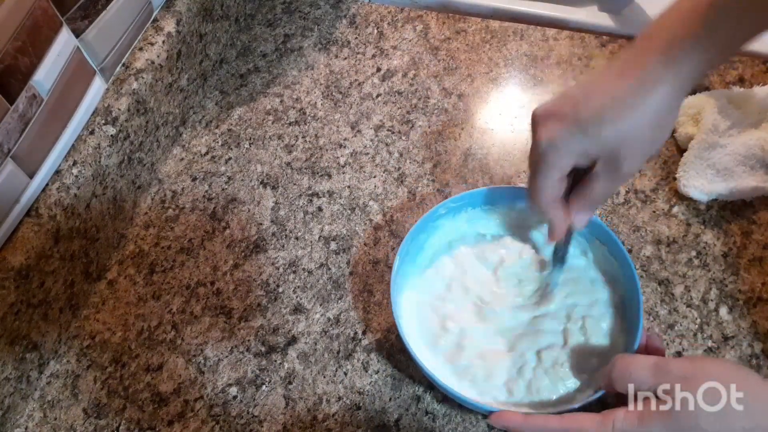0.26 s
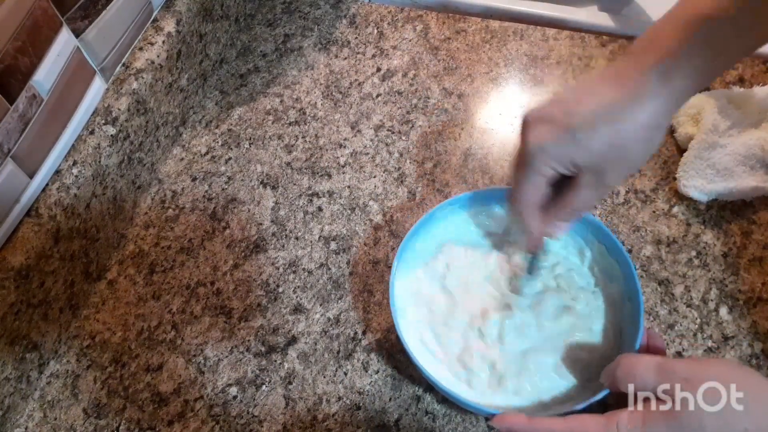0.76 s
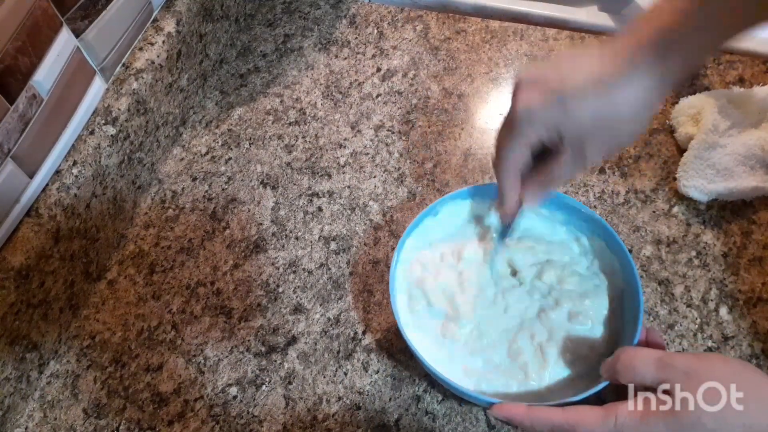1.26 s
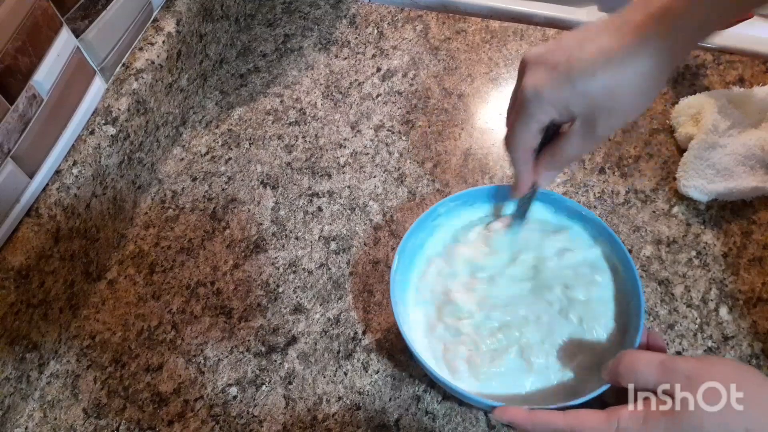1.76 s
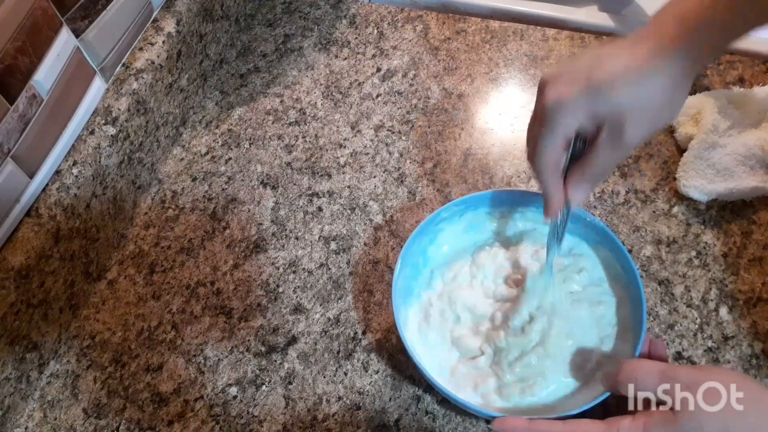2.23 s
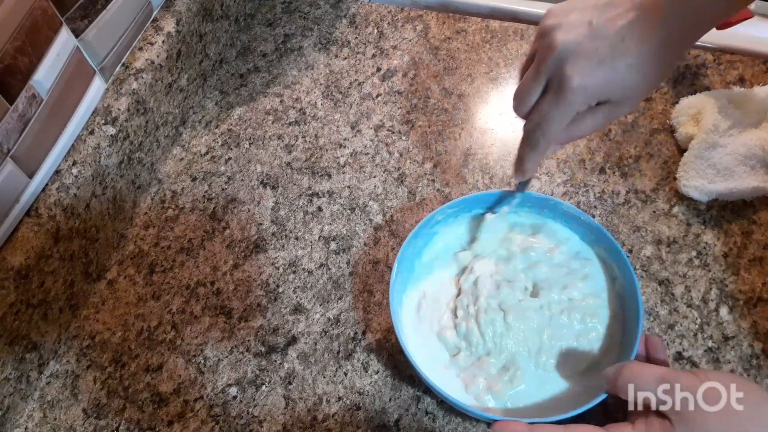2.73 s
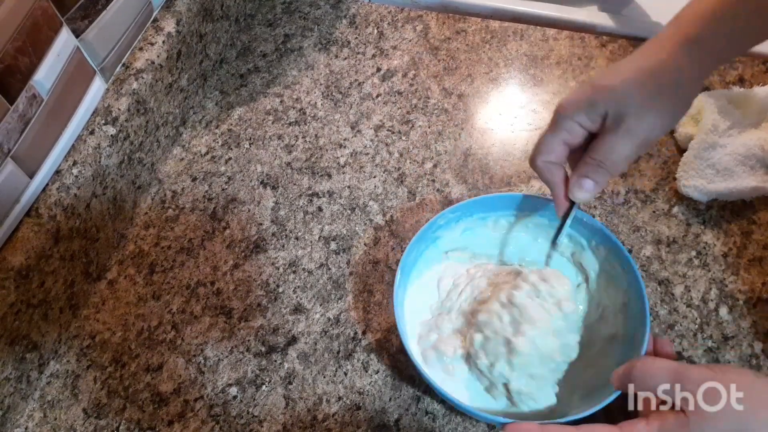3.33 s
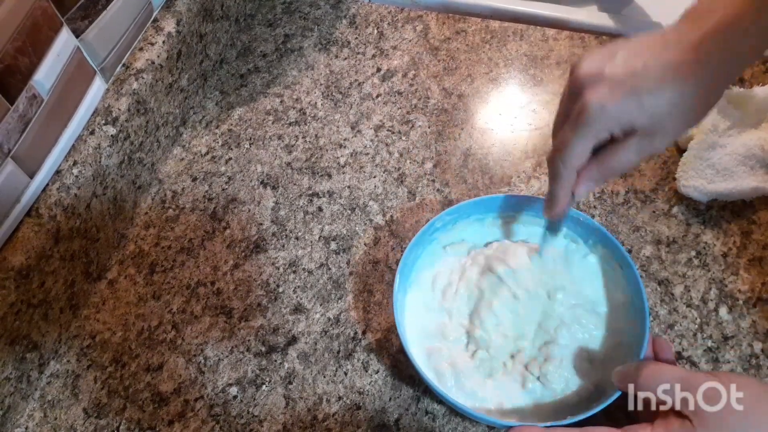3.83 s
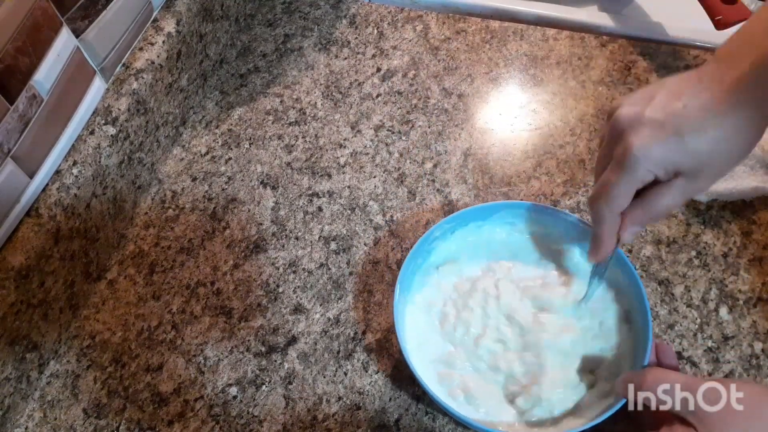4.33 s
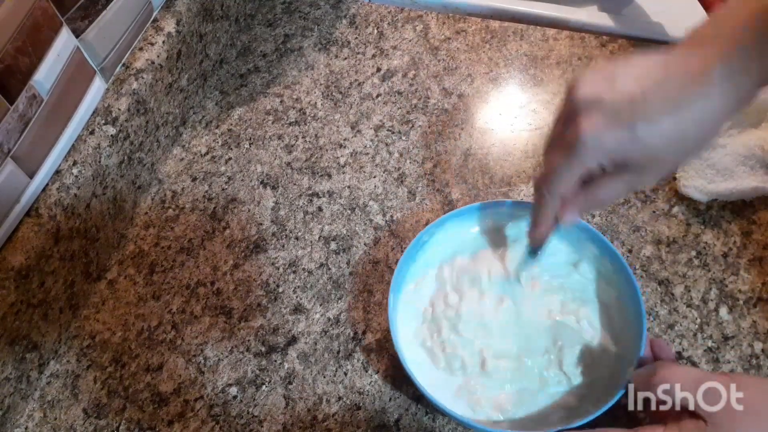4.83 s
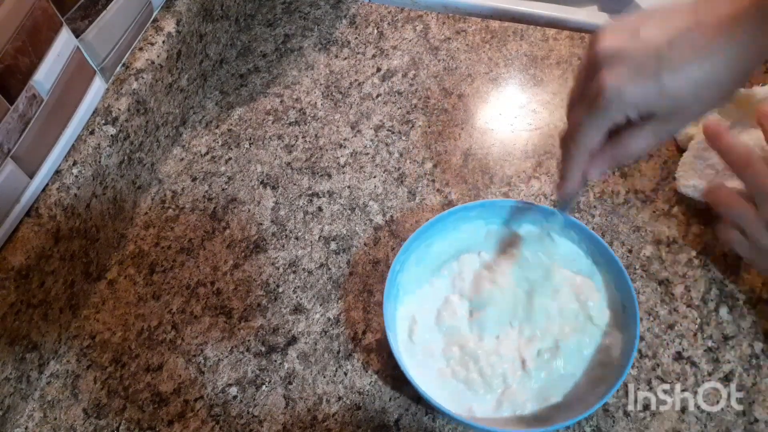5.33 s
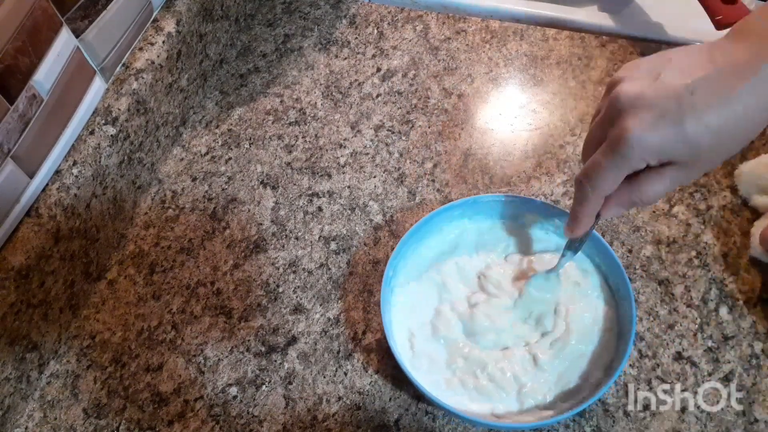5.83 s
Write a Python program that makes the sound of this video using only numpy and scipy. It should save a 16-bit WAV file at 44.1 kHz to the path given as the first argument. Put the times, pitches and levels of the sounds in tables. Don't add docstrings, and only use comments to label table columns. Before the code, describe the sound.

Quick rhythmic spoon scraping through thick batter in a plastic bowl, then a pause, heavier knocks and slow folds over faint fridge hum.

```python
import sys
import numpy as np
from scipy import signal
from scipy.fft import rfft, irfft
from scipy.io import wavfile
from scipy.ndimage import uniform_filter1d

SR = 44100
rng = np.random.default_rng(int(sys.argv[2]) if len(sys.argv) > 2 else 0)


def ratio_of_db(decibels):
    return 10 ** (np.asarray(decibels, float) / 20)


def master(y):
    cut = np.clip(np.atleast_2d(y).T, -1, 1)
    pcm = np.round(cut * 32767)
    wavfile.write(sys.argv[1], SR, pcm.astype(np.int16))


N = 268128

# (start [s], rise [ms], hold [ms], fall per 20 dB [ms], hiss level [dB])
SWEEPS = [
    (-0.05, 20, 33, 35, -44),
    (0.16, 67, 45, 104, -41),
    (0.462, 28.7, 66.5, 41, -41),
    (0.724, 12.3, 95.4, 47, -41),
    (1.022, 16, 77.5, 13, -44.5),
    (1.275, 15, 38.4, 82, -39),
    (1.562, 4.6, 53, 65, -45.5),
    (1.82, 30, 52, 75, -49.5),
    (2.101, 2.1, 25, 46, -45),
    (4.585, 72, 13, 37, -49.5),
]
# (start [s], rise [ms], hold [ms], fall per 20 dB [ms], hiss level [dB])
RETURNS = [
    (0.046, 20, 137, 63, -55),
    (0.371, 1.4, 6.1, 285, -48.5),
    (0.604, 28, 88, 51, -53),
    (0.85, 107, 105, 43, -51.5),
    (1.11, 28, 120, 72, -51.5),
    (1.429, 37, 23, 171, -51),
    (1.692, 77, 53, 72, -51.5),
    (2.002, 21, 122, 73, -57),
]
# (start [s], rise [ms], hold [ms], fall per 20 dB [ms], hiss level [dB])
FOLDS = [
    (2.691, 160, 30, 197, -51.5),
    (2.979, 43, 4.8, 89, -60),
    (3.728, 0.94, 4.2, 112, -60.5),
    (4.073, 5.3, 24, 64, -64),
    (4.152, 4.8, 4.1, 49, -62),
    (4.839, 12, 160, 106, -64),
]
# (start [s], rise [ms], hold [ms], fall per 20 dB [ms], hiss level [dB])
BRUSHES = [
    (2.23, 8.5, 140, 58, -78.5),
    (3.15, 19, 28, 83, -91),
    (4.3, 34, 22, 55, -76),
    (4.72, 13, 140, 60, -75),
    (5.03, 72, 28, 149, -67.5),
    (5.2, 122, 105, 197, -68),
    (5.452, 240, 400, 107, -85.5),
    (5.9, 150, 35, 108, -82),
]
# (frequency [Hz], width [Hz], level [dB])
SPOON_MODES = [(6230, 130, 15), (8270, 390, 22), (5200, 330, 16), (10530, 580, 22.5), (12840, 430, 21.5)]
# (frequency [Hz], density [dB per Hz])
HISS_SPECTRUM = [(1290, 1), (2200, 1.5), (2490, 3.5), (3530, 2.5), (6160, 2.5), (6640, 0), (8240, 1),
                 (9800, -3.5), (12600, -2), (15100, -2), (16000, -57.5)]


def slide():
    contacts = [sum(stroke(*row) for row in rows) for rows in (SWEEPS, RETURNS, FOLDS, BRUSHES)]
    dull_db = (-10.5, -5.5, -1, -17)
    dull_gain = sum(ratio_of_db(db) * gain for db, gain in zip(dull_db, contacts))
    slips = grains(20000.0, spread_db=1, shared=0.19)
    rings = 0
    for hz, width_hz, db in SPOON_MODES:
        rings = rings + ratio_of_db(db + 7.1 * drift(25.0)) * rms_one(resonate(slips, hz, 2.06 * width_hz))
    hiss = rms_one(colour(slips + ratio_of_db(-6.5) * rms_one(rings), HISS_SPECTRUM))
    dull = signal.sosfilt(signal.butter(2, 6800, fs=SR, output="sos"), hiss)
    bright = hiss - dull
    unsteady = ratio_of_db(1.3 * drift(36.0) - 1.5)
    return unsteady * (ratio_of_db(4.5 + 2.0 * drift(7.4)) * dull_gain * dull + sum(contacts) * bright)


# (start [s], rise [ms], hold [ms], wall level [dB], brightest pitch [Hz])
WHISK_DRAGS = [(-0.08, 164, 130, -49.5, 1490), (0.15, 16, 60, -52, 2500), (0.291, 90, 85, -44.5, 1450),
               (0.46, 59, 52, -54.5, 1980), (0.58, 66, 74, -45.5, 1670), (0.72, 11, 100, -51.5, 1980),
               (0.85, 97, 56, -44.5, 1600), (1.01, 32, 37, -56, 1940), (1.1, 112, 57, -46.5, 1790),
               (1.259, 66, 9.6, -38, 2020), (1.43, 55, 47, -47.5, 1280), (1.55, 48, 15, -42.5, 2170),
               (1.702, 39, 78, -45.5, 1370), (1.82, 35, 31, -50, 1830), (1.984, 85, 15, -47, 1410),
               (2.079, 54, 23, -51.5, 1740)]
# (start [s], rise [ms], fall per 20 dB [ms], wall level [dB], brightest pitch [Hz])
FOLD_DRAGS = [(2.687, 2.4, 49, -45, 1080), (2.7, 47, 110, -40.5, 1270), (2.82, 90, 113, -40, 1990),
              (2.815, 29, 135, -49, 1540), (2.94, 43, 80, -45.5, 1440), (3.019, 36, 44, -51.5, 1490),
              (3.2, 160, 264, -79, 1230), (3.726, 1.9, 104, -51, 1380), (3.78, 51, 31, -56.5, 1370),
              (4.075, 7.8, 94, -56, 1180), (4.152, 4, 47, -57, 1610), (4.17, 13, 122, -64, 1910),
              (4.28, 150, 400, -78, 1780), (4.582, 3.7, 156, -57.5, 1530), (4.6, 37, 35, -64, 1600),
              (4.84, 12, 70, -56, 1570), (4.883, 2.8, 53, -43.5, 1480), (4.93, 63, 62, -55.5, 1900),
              (5.05, 45, 212, -63.5, 1140), (5.3, 100, 159, -67.5, 1260), (5.72, 220, 396, -77, 1760),
              (5.92, 92, 301, -63.5, 1100)]
# (start [s], rise [ms], hold [ms], fall per 20 dB [ms], level [dB])
PRESSES = [
    (2.692, 2.7, 5, 36, -39),
    (2.722, 2.8, 12, 76, -52),
    (2.78, 9.7, 126, 90, -55.5),
    (2.96, 23, 15, 98, -60),
    (3.28, 49, 21, 200, -70),
    (4.075, 2.2, 12, 80, -53.5),
    (4.583, 6.9, 31, 56, -65),
    (4.87, 19, 8, 72, -80),
]


def drag_controls():
    whisk = [stroke(s, rise, hold, 62.6, db) for s, rise, hold, db, hz in WHISK_DRAGS]
    fold = [stroke(s, rise, 1.8, fall, db) for s, rise, fall, db, hz in FOLD_DRAGS]
    wall = sum(whisk) + sum(fold)
    centre_hz = sum(gain * row[-1] for gain, row in zip(whisk + fold, WHISK_DRAGS + FOLD_DRAGS)) / wall
    focus_db = (5 * sum(whisk) + 13 * sum(fold)) / wall
    bottom = ratio_of_db(-12.5) * sum(whisk) + ratio_of_db(-10) * sum(fold)
    bottom = bottom + ratio_of_db(-32.5) * shudder(0.0074, 0.24)
    bottom = bottom + ratio_of_db(-19.5 + in_time(WEIGHT)[0])
    bottom = bottom + sum(stroke(*row) for row in PRESSES)
    return wall, centre_hz, bottom, focus_db


SHARED_DRAG = 0.37
# (frequency [Hz], width [Hz], level [dB])
WALL_MODES = [(384, 69, 6.5), (468, 95, 3.5), (593, 60, -4), (692, 53, -3.5), (744, 63, -4), (970, 207, 7),
              (1176, 56, -1), (1280, 210, 2), (1575, 95, -1), (1789, 137, -1.5), (2170, 630, -2),
              (2680, 185, 1.5), (3360, 520, 9)]


def drag():
    wall, centre_hz, bottom, focus_db = drag_controls()
    slips = grains(4000.0, spread_db=3, shared=SHARED_DRAG)
    upper, lower = 0, 0
    for k, (hz, width_hz, db) in enumerate(WALL_MODES):
        ring = rms_one(resonate(resonate(slips, hz, width_hz), hz, 2.27 * width_hz))
        ring = (-1) ** k * ratio_of_db(db + 3.52 * drift(30.0)) * ring
        if hz > 880:
            nearness = ratio_of_db(-np.clip(focus_db, 0, 40) * np.log2(hz / centre_hz) ** 2)
            upper = upper + (nearness + 0.012) * ring
        else:
            lower = lower + 0.34 * ring + 0.5 * ring[0]
    lower = signal.sosfilt(signal.butter(6, 310, "high", fs=SR, output="sos"), lower)
    return ratio_of_db(1.05 * drift(72.0) - 6.5) * (wall * evened(upper) + bottom * evened(lower))


# (start [s], rise [ms], fall per 20 dB [ms], level [dB], centre [Hz])
BITES = [(0.068, 4.2, 60, -69, 6700), (0.19, 17, 57, -52, 5000), (0.245, 26, 63, -46, 7210),
         (0.374, 2, 30, -66, 5500), (0.52, 18, 53, -47, 7480), (0.628, 3.9, 36, -54.5, 8400),
         (0.646, 3, 38, -58, 5400), (0.775, 24, 64, -48, 7400), (0.951, 4, 56, -58, 4450),
         (1.06, 23, 62, -61, 5050), (1.214, 7.5, 54, -50.5, 5200), (1.29, 7.8, 46, -53, 7900),
         (1.435, 2.2, 48, -57, 5770), (1.453, 2.2, 94, -71, 7930), (1.57, 4.6, 26, -41, 9200),
         (1.585, 6, 65, -42, 5960), (1.707, 2.8, 58, -58.5, 6580), (1.84, 4.2, 49, -50, 8300),
         (1.895, 7.2, 31, -60, 11300), (2.11, 14, 21, -50, 3400), (2.99, 13, 66, -55, 12800),
         (3.73, 0.89, 103, -53, 5720), (4.612, 50, 52, -60, 6000), (4.66, 20, 36, -62.5, 5030),
         (4.586, 7.1, 83, -64, 1706)]
# (start [s], rise [ms], fall per 20 dB [ms], level [dB], pitch [Hz])
FLARES = [(0.06, 9.4, 50, -56, 1805), (0.185, 24, 53, -49.5, 2533), (0.37, 20, 52, -51, 1775),
          (0.39, 66, 47, -53, 1163), (0.42, 16, 30, -53, 2400), (2.724, 8.2, 50, -45, 654),
          (0.69, 16, 26, -52, 1700), (0.735, 11, 43, -54, 2520), (0.74, 15, 54, -49, 3350),
          (2.97, 38, 60, -50, 1627), (4.157, 2.8, 25, -49.5, 1857), (1.0, 5.1, 15, -45, 1620),
          (1.2, 10, 48, -57.5, 1220), (1.47, 39, 53, -51.5, 1158), (1.76, 4.7, 44, -47, 1240),
          (2.689, 4.5, 16, -30, 407), (2.73, 4.6, 50, -51, 1350), (2.724, 3.5, 57, -44.5, 496),
          (2.79, 20, 38, -41.5, 414), (2.842, 4, 20, -42, 1330), (2.878, 4, 5, -35, 1760),
          (2.88, 5.1, 24, -45, 2950), (2.895, 9.1, 38.5, -52, 2210), (3.061, 3.3, 8, -44, 1518),
          (4.077, 2, 18, -50, 337), (4.586, 29, 38, -55.5, 1346), (4.601, 6.7, 41, -64, 2000),
          (4.886, 1.7, 18, -53, 1430)]
# (time [s], level [dB], pitch [Hz])
GLIDES = [
    [(2.81, -56, 1415), (2.85, -48.5, 1550), (2.88, -47, 1725), (2.906, -46.5, 1785), (2.94, -50, 1700),
     (3.0, -56, 1608), (3.05, -58, 1486), (3.09, -54.5, 1620), (3.13, -81, 1700)],
    [(4.58, -72, 1376), (4.61, -69, 1420), (4.67, -61, 1490), (4.71, -74, 1514)],
    [(5.72, -101, 1476), (5.85, -78, 1750), (5.95, -73, 1960), (6.08, -84, 1800)],
]
GLIDE_WIDTHS_HZ = [340, 260, 360]


def flares():
    out = np.zeros((2, N + SR))
    ms = np.arange(SR // 4) / SR * 1000
    for rows, relative_width in ((BITES, 0.23), (FLARES, 0.045)):
        for s, rise, fall, db, hz in rows:
            climb = np.clip(1 - ms / max(rise, 1), 0, 1)
            fade = np.clip(ms - rise, 0, None) / max(fall, 1)
            start = round(s * SR)
            out[:, start:start + len(ms)] += sing(hz, ratio_of_db(db - 20 * (climb + fade)), relative_width * hz)
    for rows, width_hz in zip(GLIDES, GLIDE_WIDTHS_HZ):
        s, db, hz = np.transpose(rows)
        i = np.arange(round(s[0] * SR), round(min(s[-1], s[0] + 0.38) * SR))
        out[:, i] += sing(np.interp(i / SR, s, hz), ratio_of_db(np.interp(i / SR, s, db)), width_hz)
    return out[:, :N]


# (time [s], level [dB], pitch [Hz])
STREAKS = [
    [(0.0, -64, 1800), (0.1, -64, 1790), (0.33, -66.5, 1850), (0.5, -56, 1950), (0.62, -67.5, 1800),
     (0.9, -57.5, 1850), (1.08, -59, 1800), (1.3, -72.5, 1800), (2.2, -72.5, 1800)],
    [(0.0, -69, 2350), (0.2, -62, 2500), (0.33, -74, 2350), (0.58, -64, 2380), (0.7, -73, 2300),
     (0.84, -72, 2360), (1.05, -67, 2300), (1.3, -78, 2450), (2.2, -86, 2450)],
]


def streaks():
    out = 0
    r = np.exp(-2 * np.pi * 90.0 / SR)
    for rows in STREAKS:
        db, hz = in_time(rows)
        db = db - 3.0 + 5.0 * drift(14.0)
        hz = hz + 70.0 * drift(5.0)
        noise = rng.standard_normal((2, N)) + 1j * rng.standard_normal((2, N))
        slow = signal.lfilter([1], [1, -2 * r, r * r], noise + noise[0])
        ring = rms_one(np.real(slow * np.exp(2j * np.pi * np.cumsum(hz) / SR)))
        sounding = np.arange(N) < rows[-1][0] * SR
        out = out + sounding * ratio_of_db(db) * ring
    return out


# (time [s], peak level [dB], pitch [Hz], decay T60 [s])
THUMPS = [(0.043, -44, 190, 0.069), (0.07, -60, 196, 0.083), (0.204, -35.5, 133, 0.015),
          (0.235, -40.5, 183, 0.048), (0.48, -36, 140, 0.031), (0.741, -35, 144, 0.03),
          (1.036, -35, 140, 0.047), (1.29, -38.5, 166, 0.045), (1.325, -35, 182, 0.028),
          (1.339, -28, 166, 0.024), (1.357, -49.5, 140, 0.034), (1.399, -33, 145, 0.037),
          (1.588, -38, 156, 0.034), (1.657, -31.5, 140, 0.04), (1.735, -47.5, 112, 0.068),
          (1.852, -40.5, 119, 0.058), (2.139, -47, 161, 0.051), (2.689, -21.5, 205, 0.033),
          (2.704, -41, 177, 0.04), (2.751, -44.5, 220, 0.07), (2.794, -39.5, 197, 0.033),
          (2.899, -45, 198, 0.062), (2.993, -31, 155, 0.035), (3.015, -38, 167, 0.046),
          (3.27, -41.5, 140, 0.11), (3.337, -33.5, 176, 0.036), (3.735, -23.5, 153, 0.03),
          (4.046, -48.5, 163, 0.046), (4.081, -28, 164.5, 0.031), (4.156, -47.5, 170, 0.025),
          (4.591, -39, 137, 0.015), (4.846, -40.5, 153, 0.057), (4.868, -30, 167, 0.027),
          (4.888, -24.5, 169.4, 0.047), (4.902, -32.5, 209, 0.027), (4.92, -53, 180, 0.024),
          (4.977, -39.5, 134, 0.05), (5.44, -40.5, 91, 0.077), (5.472, -56, 89, 0.086),
          (5.768, -60, 91.5, 0.042)]


def shudder(rise_s, t60_s):
    out, t = np.zeros(N), np.arange(SR // 2) / SR
    for s, peak_db, hz, t60 in THUMPS:
        add(out, s, (1 - np.exp(-t / rise_s)) * ratio_of_db(-60 * t / t60_s), 0.79 * peak_db - 8.5)
    return out


# (time [s], rumble level [dB])
WEIGHT = [(0.0, -46.5), (1.1, -48.5), (1.2, -53), (1.35, -58), (1.55, -53.5), (1.9, -51), (2.05, -57.5),
          (2.55, -74), (2.8, -59), (3.1, -53.5), (3.55, -77), (4.0, -64), (4.25, -53.5), (4.65, -56),
          (4.8, -66), (5.15, -56), (5.6, -72), (6.08, -78)]
# (frequency [Hz], width [Hz], level [dB])
COUNTER_MODES = [(124.6, 20, 7.5), (140, 41, 10), (180, 22, 6), (223.3, 9.8, 4)]


def rock():
    slips = grains(600.0, spread_db=2, shared=1)[0]
    body = 0
    for hz, width_hz, db in COUNTER_MODES:
        body = body + ratio_of_db(db) * resonate(resonate(slips, hz, width_hz), hz, 2 * width_hz)
    thumps, t = np.zeros(N), np.arange(SR // 4) / SR
    for s, peak_db, hz, t60 in THUMPS:
        swell = t ** 2.75 * ratio_of_db(-100 * t / np.clip(t60, 0.02, 0.3))
        phase = 2 * np.pi * hz * t
        partials = np.sin(phase) + 0.14 * np.sin(0.758 * phase) + 0.042 * np.sin(1.51 * phase)
        add(thumps, s - 0.004, swell * partials, peak_db - 1.5)
    rumble = ratio_of_db(in_time(WEIGHT)[0] - 10.0) + ratio_of_db(-17.0) * shudder(0.0053, 0.32)
    low = thumps + rumble * rms_one(body)
    low = signal.sosfilt(signal.butter(2, 55, "high", fs=SR, output="sos"), low)
    return signal.sosfilt(signal.butter(5, 285, fs=SR, output="sos"), low)


# (time [s], peak level [dB], pitch [Hz])
KNOCKS = [(1.54, -33, 1150), (1.815, -31.5, 1320), (2.69, -28, 667), (2.724, -25, 500), (2.735, -37, 644),
          (2.731, -32, 970), (2.901, -28, 1740), (3.728, -40.5, 1499), (3.82, -47, 1790), (4.076, -33, 420),
          (4.157, -33, 1500), (4.586, -50, 1300), (4.849, -52, 1370), (4.886, -38, 417), (4.978, -47, 600)]


def knocks():
    out, t = np.zeros(N), np.arange(SR // 10) / SR
    for s, peak_db, centre_hz in KNOCKS:
        contact = rng.standard_normal(len(t)) * ratio_of_db(-60 * t / 0.011)
        ring = 0
        for hz, width_hz, db in WALL_MODES:
            gain = ratio_of_db(db - 83.0 * np.log2(hz / centre_hz) ** 2) + 0.0068
            ring = ring + gain * resonate(resonate(contact, hz, 0.89 * width_hz), hz, 2.0 * width_hz)
        add(out, s, ring, peak_db - 10.0)
    return out


# (time [s], peak level [dB], pitch [Hz], spread [octaves])
TICKS = [(0.374, -40.5, 7000, 2.2), (2.0096, -45, 5170, 0.25), (2.1027, -38, 5100, 1.3),
         (2.2473, -47.5, 4850, 0.42), (2.313, -58, 8100, 0.65), (2.368, -58, 13000, 1.2),
         (2.415, -64, 5700, 0.92), (2.689, -51, 5840, 0.16), (3.003, -35, 3500, 1.3),
         (3.1555, -60.5, 5470, 2), (3.316, -66, 8100, 0.42), (3.6785, -65.5, 9400, 0.47),
         (3.7301, -30, 9400, 3.4), (4.077, -62, 1500, 2.0), (4.099, -54.5, 6040, 1.7),
         (4.584, -70, 1800, 1.4), (4.8496, -45, 5100, 0.87), (4.887, -34.5, 2780, 1),
         (4.9804, -51, 3660, 2)]


def ticks():
    out, t = np.zeros(N), np.arange(SR // 6) / SR
    for s, peak_db, hz, octaves in TICKS:
        decay = ratio_of_db(-60 * t / 0.0085) + 0.24 * ratio_of_db(-60 * t / 0.011) + 0.082 * ratio_of_db(-60 * t / 0.31)
        crack = rng.standard_normal(len(t)) * decay
        add(out, s, resonate(crack, hz, np.clip(octaves, 0.05, 3) * 0.29 * hz), peak_db + 0.5)
    return out


def kitchen_tails():
    t = np.arange(SR // 2) / SR
    decay = ratio_of_db(-60 * t / 0.087) * (t > 0.006)
    tails = rfft(rng.standard_normal((2, len(t))) * decay, N)
    return ratio_of_db(-9) * tails / np.sqrt(np.mean(np.abs(tails) ** 2))


# (delay [ms], level [dB])
ECHO_LEFT = [(0.42, -14.5), (1.298, -20), (2.9, -22)]
# (delay [ms], level [dB])
ECHO_RIGHT = [(.63, -15.5), (1.698, -3.5), (3.598, -1)]
# (frequency [Hz], left minus right [dB])
LEAN = [(60, 5.5), (180, 9), (290, 3), (420, 3.5), (600, 10), (1000, 7.5), (2000, 9), (5000, 7),
        (9000, 11.5)]


def ports(x, tails):
    f = np.fft.rfftfreq(N, 1 / SR) + 1
    rise = 1j * f / 390
    reach = rise ** 2 / (1 + np.sqrt(2) * rise + rise ** 2)
    left_lag_ms = 0.091 - 0.1 * (1 - np.abs(reach) ** 2)
    sides = ((ECHO_LEFT, left_lag_ms, 0.5), (ECHO_RIGHT, 0, -0.5))
    out = []
    for port, tail, (echoes, lag_ms, side) in zip(x, tails, sides):
        near = sum(ratio_of_db(db) * np.exp(-2j * np.pi * f * ms / 1000) for ms, db in echoes)
        path = (1 + reach * (near + tail)) * np.exp(-2j * np.pi * f * lag_ms / 1000)
        out.append(irfft(rfft(port) * path * ratio_of_db(side * at_hz(LEAN, f)), N))
    return np.array(out)


# (time [s], level [dB])
MOTOR = [(0.0, -66), (0.34, -79), (0.96, -61), (1.54, -80), (2.01, -62), (2.59, -77), (3.28, -66.5),
         (4.05, -78), (4.3, -64.5), (4.93, -69), (5.11, -77), (6.08, -67.5)]


def motor():
    throb = resonate(resonate(rng.standard_normal(N), 60.0, 4.7), 55.1, 8.9)
    load = ratio_of_db(in_time(MOTOR)[0] + 4.5 + 1.5 * drift(4.8))
    pushed = ratio_of_db(-26) * shudder(0.01, 0.2)
    return (load + pushed) * ratio_of_db(-3.0) * evened(throb)


# (frequency [Hz], density [dB per Hz])
ROOM = [(25, -37), (48, -5.5), (80, -27), (112, 6.5), (150, -12), (270, -20), (400, -21), (950, -27.5),
        (1320, -25), (1700, -29), (2600, -35.5), (3600, -37), (6500, -42.5), (9500, -36.5), (12000, -36.5),
        (16000, -34)]
# (frequency [Hz], left-right correlation [-1 to 1])
LIKENESS = [(60, 1), (130, 0.43), (290, 0.47), (640, 0), (1400, .0)]
# (frequency [Hz], rms level [dB])
HUM = [(359.8, -85), (479.6, -94.5), (599.6, -85.5), (719.4, -91), (1079.5, -89), (1199, -92), (1305, -89),
       (1363.5, -88)]


def room():
    f, t = np.fft.rfftfreq(N, 1 / SR) + 1, np.arange(N) / SR
    mid, side = rfft(rng.standard_normal((2, N))) * ratio_of_db(at_hz(ROOM, f))
    alike = np.clip(at_hz(LIKENESS, f), -1, 1)
    opposite = np.array([[1], [-1]])
    air = irfft(np.sqrt(1 + alike) * mid + np.sqrt(1 - alike) * side * opposite, N)
    hum = 0
    for hz, db in HUM:
        cycles = hz * t + rng.random((2, 1)) * 0.59
        hum = hum + ratio_of_db(db + 2.5 + 1.5 * drift(5.0)) * np.sin(2 * np.pi * cycles)
    port_gains = ratio_of_db(np.array([[3.0], [-3.5]]))
    return (ratio_of_db(-68 + drift(0.28)) * rms_one(air) + hum) * port_gains


def stroke(start_s, rise_ms, hold_ms, fall_ms, db):
    ms = 1000 * (np.arange(N) / SR - start_s)
    climb = np.clip(1 - ms / max(rise_ms, 1), 0, 1)
    fade = np.clip(ms - rise_ms - hold_ms, 0, None) / max(fall_ms, 1)
    return (ms > 0) * ratio_of_db(db - 20 * np.minimum(climb + fade, 10))


def grains(per_s, spread_db, shared):
    sizes = ratio_of_db(spread_db * np.minimum(rng.exponential(1, (3, N)), 4)) * rng.choice([-1, 1], (3, N))
    slips = sizes * (rng.random((3, N)) < per_s / SR)
    return rms_one(np.sqrt(shared) * slips[0] + np.sqrt(1 - shared) * slips[1:])


def sing(hz, gain, width_hz):
    shape = (3, len(gain) + 500)
    noise = rng.standard_normal(shape) + 1j * rng.standard_normal(shape)
    mixed = np.sqrt(SHARED_DRAG) * noise[0] + np.sqrt(1 - SHARED_DRAG) * noise[1:]
    r = np.exp(-2 * np.pi * width_hz / SR)
    slow = signal.lfilter([1], [1, -2 * r, r * r], mixed)[:, 500:]
    return gain * rms_one(np.real(slow * np.exp(2j * np.pi * np.cumsum(hz + 0 * gain) / SR)))


def resonate(x, hz, width_hz):
    r = np.exp(-np.pi * width_hz / SR)
    zeros = np.array([1, 0, -1]) * (1 - r * r) / 2
    return signal.lfilter(zeros, [1, -2 * r * np.cos(2 * np.pi * hz / SR), r * r], x)


def drift(rate):
    r = np.exp(-80 * np.pi * rate / SR)
    slow = signal.lfilter([1], [1, -2 * r, r * r], rng.standard_normal(N // 40 + 2002))[2000:]
    return np.interp(np.arange(N) / 40, np.arange(len(slow)), rms_one(slow))


def evened(x):
    power = np.mean(np.atleast_2d(x) ** 2, axis=0)
    return x / np.sqrt(uniform_filter1d(power, size=3000) + 1e-20)


def rms_one(x):
    return x / np.sqrt(np.mean(x ** 2) + 1e-20)


def in_time(rows):
    s, *columns = np.transpose(rows)
    return [np.interp(np.arange(N) / SR, s, column) for column in columns]


def at_hz(points, hz):
    table_hz, db = np.transpose(points)
    return np.interp(np.log(hz), np.log(table_hz), db)


def colour(x, points):
    f = np.clip(np.fft.rfftfreq(N, 1 / SR), 1, 15000)
    return irfft(rfft(x) * ratio_of_db(at_hz(points, f)), N)


def add(out, s, burst, peak_db):
    i = round(s * SR)
    out[i:i + len(burst)] += (ratio_of_db(peak_db) * burst / np.abs(burst).max())[:N - i]


def scene():
    scrape = slide() + drag() + flares() + streaks()
    blows = rock() + knocks() + ticks() + motor()
    clumps = ratio_of_db(drift(210) - 0.31)
    return ports(clumps * scrape + blows, kitchen_tails()) + room()


def top_cut(x):
    return signal.sosfilt(signal.butter(12, 15850, fs=SR, output="sos"), x)


def record(dry):
    cut = signal.sosfilt(signal.cheby2(12, 60, 17100, fs=SR, output="sos"), dry)
    cut = signal.sosfilt(signal.butter(2, 42, "high", fs=SR, output="sos"), cut)
    return top_cut(cut)


dry = scene()
out = record(dry)
master(out)
```